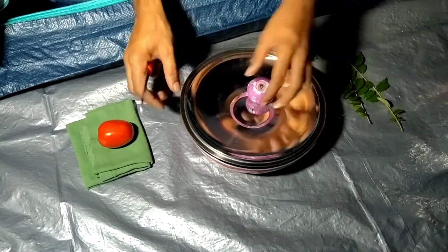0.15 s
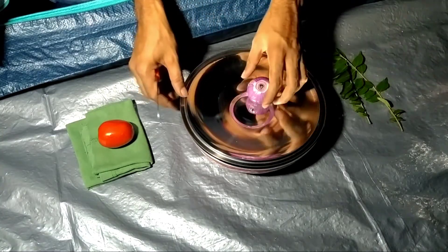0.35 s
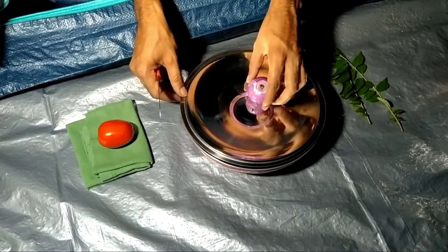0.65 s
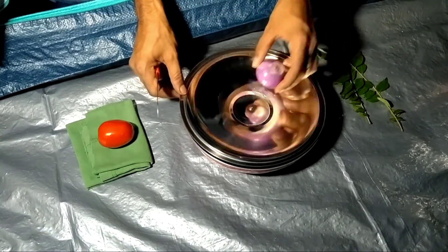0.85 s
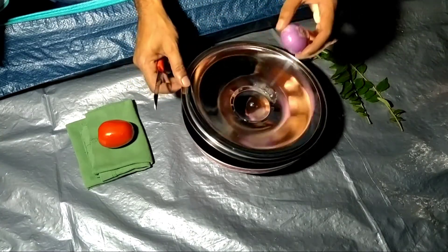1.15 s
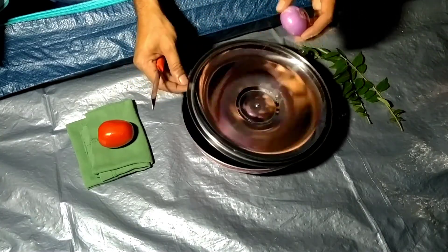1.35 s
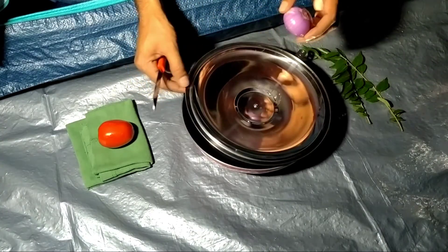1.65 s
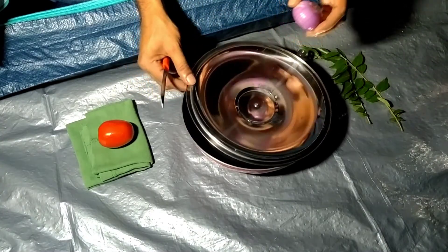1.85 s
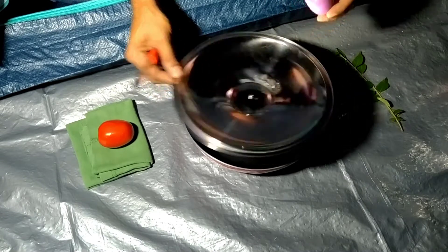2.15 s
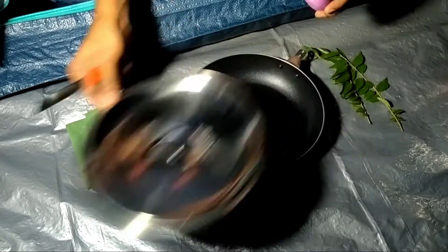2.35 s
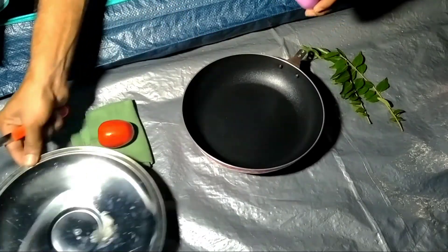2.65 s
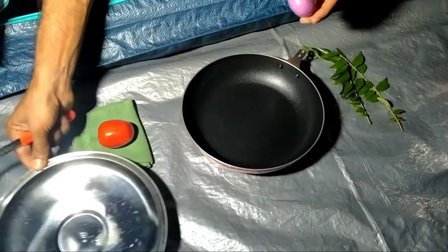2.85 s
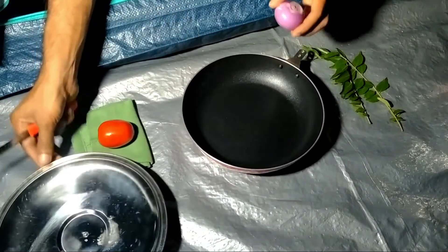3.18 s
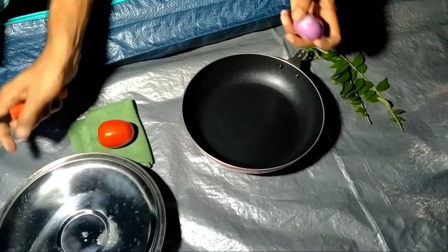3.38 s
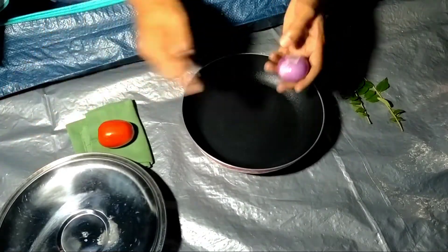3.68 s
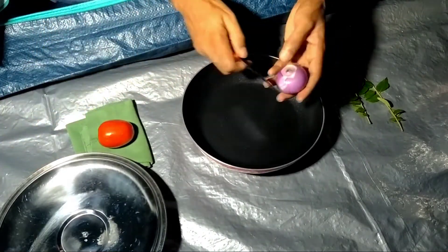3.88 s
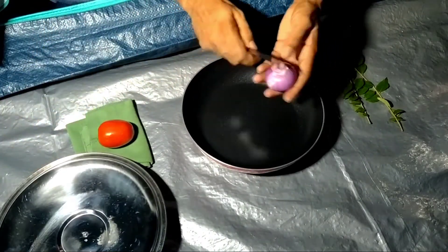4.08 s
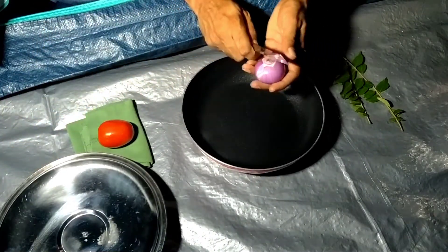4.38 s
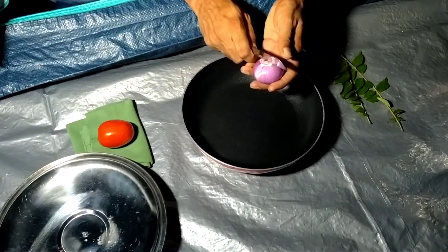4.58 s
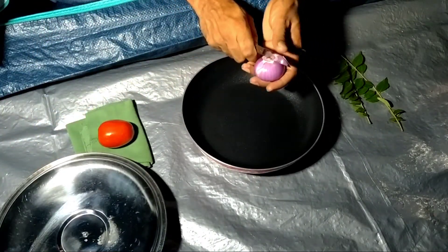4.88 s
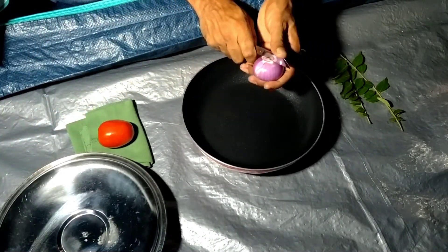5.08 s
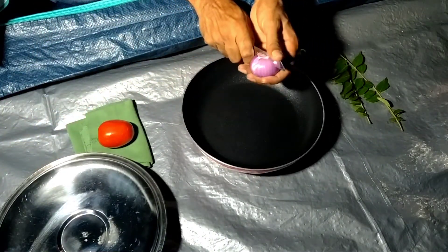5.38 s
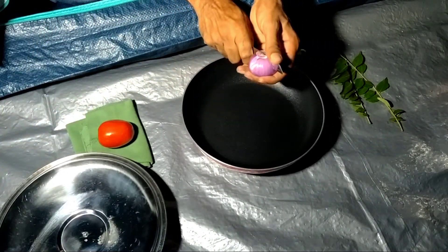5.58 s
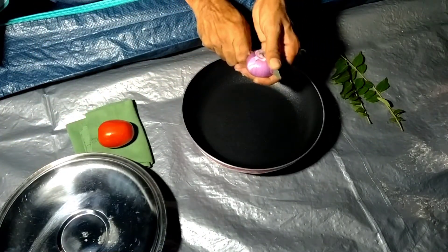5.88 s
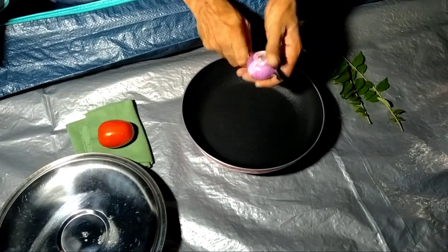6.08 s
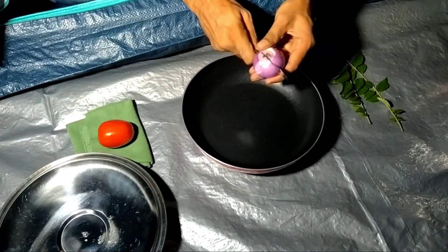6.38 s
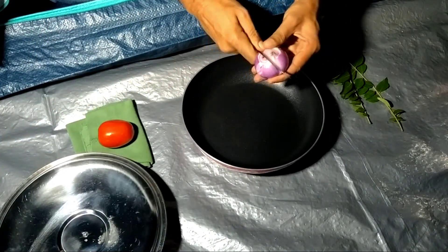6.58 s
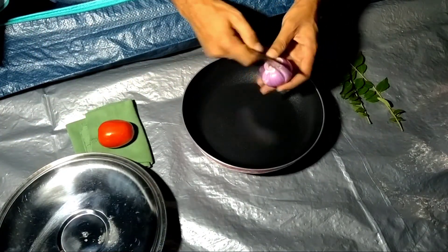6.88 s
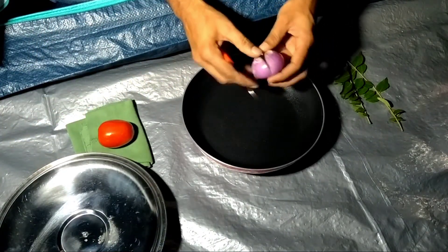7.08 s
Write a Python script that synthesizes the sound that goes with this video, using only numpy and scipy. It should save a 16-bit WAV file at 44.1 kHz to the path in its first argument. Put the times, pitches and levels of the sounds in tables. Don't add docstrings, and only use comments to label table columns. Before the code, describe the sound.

Outdoors at night, steady shrill crickets surround a tiny metal clink, one hard lid clang, then papery onion peel crackling close by.

```python
import sys
import numpy as np
from scipy import signal
from scipy.fft import rfft, irfft
from scipy.io import wavfile
from scipy.ndimage import uniform_filter1d

SR = 44100
rng = np.random.default_rng(int(sys.argv[2]) if len(sys.argv) > 2 else 0)


def dump_mix(stems):
    frames = np.atleast_2d(stems).T
    limited = np.clip(frames, -1, 1)
    pcm = np.round(limited * 32767).astype(np.int16)
    wavfile.write(sys.argv[1], SR, pcm)


def how_loud(loudness_db):
    steps = np.asarray(loudness_db, float) / 20
    return 10 ** steps


N = 319284

STROKES_PER_S = 24.5
CLANG_S = 1.389


def evened(x):
    return x / np.sqrt(np.mean(x ** 2) + 1e-20)


def read(points, hz):
    f, value = np.transpose(points)
    return np.interp(np.log(hz + 1), np.log(f + 1), value)


def add(mix, s, sound, pan_db=0):
    part = mix[:, round(s * SR):][:, :sound.shape[-1]]
    part += sound[..., :part.shape[1]] * how_loud(np.array([[pan_db / 2], [-pan_db / 2]]))


def colour(x, points, tilt_db=0):
    hz = np.fft.rfftfreq(x.shape[-1], 1 / SR)
    tilt = tilt_db * np.tanh(np.log2((hz + 1) / 5000))
    return irfft(rfft(x) * how_loud(read(points, hz) + tilt), x.shape[-1])


def band(x, hz, width_hz):
    b, a = signal.iirpeak(hz, hz / width_hz, SR)
    return signal.lfilter(b, a, signal.lfilter(b, a, x))


def ring(modes, length):
    hz, db, t60 = np.transpose(modes)[..., None]
    t = np.arange(round(length * SR)) / SR
    return (how_loud(db - 60 * t / t60) * np.sin(2 * np.pi * hz * t)).sum(0)


def bushes(x, t60, wet_db, echo=1):
    t = np.arange(SR // 3) / SR
    taps = rng.standard_normal((2, len(t))) * (rng.random((2, len(t))) < .05)
    taps = taps * how_loud(-60 * t / t60) * np.minimum(t / 0.0055, 1)
    taps *= how_loud(wet_db) / np.linalg.norm(taps, axis=1, keepdims=True)
    near = rng.integers(150, 1000, (2, 3))
    np.put_along_axis(taps, near, echo * rng.uniform(.4, .8, near.shape), 1)
    taps[[0, 1], rng.integers(0, 24, 2)] += 1
    taps /= np.linalg.norm(taps, axis=1, keepdims=True)
    return signal.fftconvolve(x[None], taps, axes=1)


def trill(length, top_hz, per_s, fall_hz, closed, sluggish, overtone_db, lean=.72):
    t = np.arange(round(length * SR)) / SR
    phase = np.minimum(t * per_s % 1 / closed, 1)
    cold = sluggish * np.exp(-1.4 * np.floor(t * per_s))
    hz = top_hz * (1 - 0.03 * cold) - fall_hz * phase ** 1.8
    turn = 2 * np.pi * np.cumsum(hz) / SR
    stroke = abs(np.sin(np.pi * phase ** lean))
    stroke *= (1 - 0.14 * cold) * (1 - 0.24 * sluggish * np.exp(-t / .15))
    stroke *= np.minimum((length - t) / 0.063, 1)
    return evened(stroke * (np.sin(turn) + how_loud(overtone_db) * np.sin(2 * turn)))


def air():
    # (frequency [Hz], level [dB per Hz])
    hiss = [(20, -84.5), (100, -84.5), (220, -83.5), (450, -89.5), (900, -94), (1800, -99), (2800, -99),
            (4500, -93.5), (6000, -108), (8500, -103), (12000, -104), (12400, -120), (16000, -126)]
    # (frequency [Hz], likeness [0-1])
    likeness = [(30, 0.12), (300, 0.033), (1000, 0.19), (3000, 0.12), (15000, 0.0181)]
    hz, _, z = signal.stft(rng.standard_normal((2, N)), SR, nperseg=1024)
    same = np.clip(read(likeness, hz), 0, 1)[:, None]
    z = np.array([z[0], same * z[0] + np.sqrt(1 - same ** 2) * z[1]])
    patches = uniform_filter1d(rng.standard_normal(z[0].shape), 10, 0)
    patches = evened(uniform_filter1d(patches, 8, 1))
    patch_db = 4.5 * np.clip(hz / 1500, .3, 1)[:, None] * patches
    z = z * how_loud(read(hiss, hz)[:, None] + patch_db) * np.sqrt(SR / 2)
    return signal.istft(z, SR, nperseg=1024)[1][:, :N]


def insect_bands():
    # (pitch [Hz], width [Hz], level [dB], throbs [per s], throb depth [0-1])
    far_bands = [(3070, 340, -65, 0.728, .4), (3825, 100, -64.5, 3.0, 0.5), (5130, 60, -71.5, 6.5, .8),
                 (5346, 1100, -57.5, 0.81, 0)]
    out, t = np.zeros((2, N)), np.arange(N) / SR
    for hz, width_hz, db, per_s, depth in far_bands:
        pace = per_s * (1 + .5 * np.interp(t, np.arange(30) / 4, rng.standard_normal(30)))
        throb = 1 + depth * np.sin(2 * np.pi * (np.cumsum(pace) / SR + rng.random()))
        out += how_loud(db) * throb * evened(band(rng.standard_normal((2, N)), hz, width_hz))
    return out


def thin_singer():
    # (start [s], level [dB])
    thin_turns = [(.755, -60), (1.795, -65), (2.79, -62), (4.17, -62), (5.405, -63), (6.92, -65)]
    out, per_s = np.zeros((2, N)), 6.75
    song = trill(4 / per_s, 5050, per_s, fall_hz=25, closed=.3, sluggish=0, overtone_db=-60, lean=1)
    for s, db in thin_turns:
        add(out, s, how_loud(db) * bushes(song, t60=.3, wet_db=-4.5, echo=.3))
    return out


def low_cricket():
    out, db, pan_db = np.zeros((2, N)), -59.5, -4.5
    song = trill(.27, 3320, 10.7, fall_hz=380, closed=.5, sluggish=0, overtone_db=-60, lean=1.1)
    turns = np.arange(.028, N / SR, 1.4915)
    for s in np.delete(turns, 1):
        add(out, s, how_loud(db) * song, pan_db)
        add(out, s, how_loud(db - 2) * bushes(song, t60=0.55, wet_db=-6, echo=0.53), pan_db)
    return out


def far_chorus():
    # (time [s], level [dB])
    swell = [(0, -37.5), (.6, -35.5), (1.2, -34.5), (1.452, -41), (1.95, -42.5), (2.2, -39.5), (2.7, -43.5),
             (2.879, -47), (3.3, -39.5), (3.75, -44.5), (4.25, -39), (4.65, -41.5), (5.099, -44),
             (5.35, -35), (6.0, -42), (6.45, -39), (6.851, -38), (7.24, -29)]
    crowd = np.zeros(N + 2 * SR)
    for k, (high, pace) in enumerate(rng.standard_normal((120, 2))):
        song = trill(.3, 7780 + 420 * np.tanh(high), STROKES_PER_S + pace, 850, .5, .5, -41)
        crowd[round(k * .066 * SR):][:len(song)] += song
    far = bushes(crowd[:N + SR // 2], t60=.45, wet_db=10)
    far = evened(far[:, SR // 2:][:, :N])
    out = np.zeros((2, N))
    add(out, 0, far * how_loud(np.interp(np.arange(N) / SR, *np.transpose(swell))), -2.5)
    return out


def near_crickets():
    # (start [s], level [dB], left minus right [dB])
    lead_trills = [(.13, -28, -3.5), (.769, -23, 2), (1.53, -34.5, -1), (2.225, -28, 1), (2.907, -31, -3),
                   (3.72, -40.5, -0.5), (4.3, -31, -5.5), (5.396, -24, 2.5), (5.65, -32, -1),
                   (6.883, -24, 2.5)]
    deep_trills = [(1.06, -38.5, 0.5), (2.5, -41, 2), (3.36, -38, -3), (3.9, -36.5, -1), (4.68, -35.5, 1),
                   (6.05, -47, -19.5)]
    high_trills = [(.45, -41.5, -1.5), (2.05, -54.5, 6.5), (3.15, -43.5, -3.5), (3.55, -50.5, -1),
                   (5.05, -56, -20), (5.7, -58.5, -3), (6.55, -43.5, 19)]
    out = np.zeros((2, N))
    # trills, trill length in s, pitch in Hz at the start of a wing stroke
    singers = [(lead_trills, 0.26, 7850), (deep_trills, 0.24, 7500), (high_trills, 0.13, 8030)]
    for trills, length, hz in singers:
        for start, db, pan_db in trills:
            song = trill(length, hz, STROKES_PER_S, fall_hz=1057.6, closed=0.66, sluggish=.9, overtone_db=-39.5)
            wet_db = 10.5 - .3 * (db + 28)
            add(out, start, how_loud(db) * bushes(song, t60=0.9, wet_db=wet_db), pan_db)
    return out


def bumps():
    # (time [s], level [dB], pitch [Hz], left minus right [dB])
    hollow_bumps = [(0.502, -50, 388, -2), (0.646, -46, 330, 0), (.801, -48, 450, 0), (0.842, -47, 460, 0),
                    (0.912, -35, 482, 1), (0.965, -45, 700, -1), (1.04, -52, 630, -2), (1.18, -49, 730, -2),
                    (1.23, -51, 750, 0), (1.93, -55, 600, 0), (1.975, -52, 620, 0), (2.998, -44, 543, -2.5)]
    dry_taps = [(0.331, -51, 318, 0), (0.801, -34, 2360, -6), (2.0, -45.5, 600, -1), (3.11, -53, 1330, -8),
                (2.094, -45, 600, -0.5), (2.612, -55, 860, 4), (3.022, -42.5, 430, -4),
                (3.048, -48, 880, -2), (4.23, -50, 500, -1), (6.608, -44.5, 300, 8)]
    out, t = np.zeros((2, N)), np.arange(6000) / SR
    for knocks, t60 in ((hollow_bumps, 0.19), (dry_taps, 0.065)):
        for s, db, hz, pan_db in knocks:
            puff = band(rng.standard_normal(len(t)), hz, 0.78 * hz)
            puff *= how_loud(-60 * t / t60) * np.minimum(t / 0.002, 1)
            add(out, s, how_loud(db + 0.5) * puff / abs(puff).max(), pan_db)
    return out


def rustle():
    # (start [s], length [s], level [dB], left minus right [dB], body over treble [dB])
    moves = [(0.746, 0.94, -61.5, -4, 4.5), (2.386, 0.27, -56.5, -3, -3), (3.003, 0.058, -64, -13, 18.5),
             (3.39, 0.58, -60, -9, -0.5), (3.754, 0.31, -52, -7.5, -6), (4.134, 0.19, -67.5, 1, 7.5),
             (4.9, 0.47, -52.5, -3, -18), (5.441, .17, -45, -1, -14.5), (5.638, .19, -44.5, -3, -19),
             (5.783, 0.25, -42.5, -4, -20.5), (5.956, .24, -55, -4, -12), (6.438, 0.22, -43.5, -5, -22),
             (6.581, .13, -40, 4, -11.5), (6.691, 0.13, -48, -4.5, -9), (6.919, 0.071, -54, 7, 0.5)]
    out = np.zeros((2, N))
    for s, length, db, pan_db, body_db in moves:
        n = 2 * round(length * SR / 2)
        grains = how_loud(2.35 * rng.exponential(1, n)) * (rng.random(n) < 900 / SR)
        grit = (1.8 + evened(uniform_filter1d(grains, 60))) * rng.standard_normal((2, n))
        treble = colour(grit, [(7000, -21.5), (8800, -4.0), (12000, -5.5), (12500, -20.5), (16000, -33)])
        body = colour(grit, [(600, -5), (1500, 7.5), (3000, 1.0), (6500, 2.0), (9000, 0), (16000, -39)])
        side = how_loud(np.array([[pan_db], [-pan_db]]) / 2)
        move = evened(treble) * side + how_loud(body_db) * evened(body)
        add(out, s, how_loud(db) * move * signal.windows.hann(n))
    return out


def skin_cracks():
    # (time [s], level [dB], treble tilt [dB], left minus right [dB])
    snaps = [(0.1998, -47, 17, 3), (0.3338, -43.5, -13.5, 3), (0.503, -39.5, -11, 3),
             (0.9124, -35, -6.5, -8), (2.998, -43.5, -17, -7), (5.13, -44, 2, 1), (5.2131, -40, -1, -2),
             (5.3035, -33, -5.5, -4.5), (5.3075, -25.5, -3, 1.5), (5.3115, -28, 1.5, 1.5),
             (5.3155, -39, 1, 1), (5.6249, -45, 6, 2.5), (5.9249, -37.5, -4, 2.5), (6.9522, -34.5, -1, -6),
             (5.024, -48, 8, -2), (5.1847, -48, 7.5, -2.5), (5.494, -47.5, 3, -4.5), (5.6771, -43, -4, -2),
             (5.811, -41.5, -4, 4), (5.986, -48, 0, -6)]
    # (time [s], level [dB], left minus right [dB], treble tilt [dB])
    tear = [(6.5093, -31.5, -1.5, 8), (6.521, -29.5, -1, 8.5), (6.5286, -25, -2.5, 8),
            (6.536, -26.5, 0, 5.5), (6.55, -39, -0.5, 1), (6.5706, -28.5, -0.5, 6), (6.581, -29.5, 4, 0),
            (6.591, -40, -3, -9), (6.6026, -29, -0.5, -3), (6.6165, -18.5, -1.5, 0),
            (6.6247, -17.5, -4, -3), (6.6373, -18.5, -2, 6), (6.645, -20.5, 4, -1), (6.653, -27.5, 0, 1.5),
            (6.6575, -23.5, 1, -6), (6.664, -23, -5, 1.5), (6.6784, -24.5, -5.5, -3),
            (6.7081, -24, -0.5, -1), (6.7153, -21.5, -6, -2), (6.721, -35, -5.5, 3.5),
            (6.7384, -28, -1.5, -7), (6.7463, -20.5, -4, -3), (6.7524, -18, -3, 0), (6.767, -28.5, -2, -6),
            (6.759, -31, -0.5, -5), (6.7961, -27.5, 1.5, -2), (6.8157, -33.5, -0.5, -6)]
    # (frequency [Hz], level [dB per Hz])
    skin = [(290, -31), (500, -32), (878, -36), (1500, -17.5), (2100, -14.5), (3460, -7.5), (4820, -8),
            (8580, 2.5), (10200, -2.5), (11100, 3.5), (15700, -38)]
    out, t = np.zeros((2, N)), np.arange(2048) / SR
    length = .0026
    cracks = [(*row, .06) for row in snaps]
    cracks += [(s, db, tilt_db, pan_db, 0.27) for s, db, pan_db, tilt_db in tear]
    for s, db, tilt_db, pan_db, rattle in cracks:
        noise = evened(colour(rng.standard_normal((2, len(t))), skin, tilt_db))
        noise = (noise + 0.5 * noise[0]) / 1.35
        late = t / length - 2
        burst = np.exp(-(late / 0.93) ** 2)
        burst += rattle * how_loud(-60 * t / 0.24) * np.clip(late + 1, 0, 1)
        add(out, s - 1.2 * length, how_loud(db - 1.0) * burst * noise, pan_db)
    return out


def lid_blows():
    # (time [s], level [dB], brightness [dB])
    blows = [(1.374, -19, -7), (1.382, -11, -3), (1.389, 0.5, 0.5), (1.393, -7, 1.5), (1.406, -18.5, -17),
             (1.426, -6, 3), (1.441, -17, 8.5), (1.476, -23, 8), (1.49, -13, -3), (1.509, -33, 11),
             (1.521, -16, -1.5), (1.592, -15.5, -5.5), (1.601, -18, 3), (1.616, -13, -1.5),
             (1.644, -29, -6.5)]
    # (pitch [Hz], level [dB], time to fall 60 dB [s])
    lid_modes = [(271, -22.5, 0.44), (410.7, -5.5, 0.039), (518.4, -6.5, 0.13), (560, -5, 0.13),
                 (672, 0, 0.16), (753, 13, 0.029), (808, -28, 1.9), (872, -12, 0.55), (921.6, -4, 0.3),
                 (1095, -17, 0.22), (1227, -28.5, 1.1), (1250, -38.5, 0.25), (1240, -15.5, .15),
                 (1751, -4.5, 0.15), (2089, -17, 0.36), (1188, -27, 0.76), (2120, -23, 0.7),
                 (2164, -20, 0.8), (2290, -31, 0.35), (2514, -36, 1.4), (2810, -40, 1.7),
                 (2980, -29.5, 0.34), (3000, -43.5, 2.1), (3150, -30, 0.9), (3700, -29.5, 0.27),
                 (4470, -19, 0.26), (3488, -26, 0.61), (3240, -25, .5), (4732, -26.5, .4), (5280, -30, .5),
                 (4040, -33.5, .4), (1780, -16.5, .12), (716, -13, 0.4), (3930, -26, 0.26), (5170, -34, .6),
                 (5574, -36, .4), (2370, -18.5, .2), (2810, -19, .12), (5700, -33, .1), (8830, -5.5, 0.1),
                 (9700, -26, 0.113), (11370, -17.5, 0.22)]
    # (frequency [Hz], level [dB per Hz])
    rim_clash = [(24, -77.5), (40, -52), (352, -28.5), (657, -15), (1010, -14.5), (2080, -13),
                 (2600, -18.5), (3000, -17), (4150, -25), (4550, -18.5), (5930, -21.5), (10300, -14),
                 (15700, -60.5)]
    out, t = np.zeros((2, N)), np.arange(8192) / SR
    hz, level_db, t60 = np.transpose(lid_modes)
    high = np.log2(hz / 1000)
    after = np.arange(round(.9 * SR), dtype=np.float32) / SR
    dying = how_loud(level_db[:, None] - 60 * after / t60[:, None])
    dying = dying * np.minimum(after / 0.003, 1)
    fade = (how_loud(-60 * t / 0.036) + 0.37 * how_loud(-60 * t / 0.35)) * np.minimum(t / 0.0013, 1)
    for s, db, bright_db in blows:
        pressed = hz + 2.5 / t60 * rng.standard_normal(len(hz))
        modes = dying * np.sin(np.float32(2 * np.pi * pressed)[:, None] * after)
        share = rng.choice([-1, 1], len(hz)) * how_loud(4.0 * rng.standard_normal(len(hz)) + bright_db * high / 2)
        apart = np.clip(0.18 * high, 0, 1) * rng.uniform(-1.13, 1, len(hz))
        sides = np.array([share * (1 + apart), share * (1 - apart)])
        add(out, s, how_loud(db - 15.0) * sides @ modes)
        middle, apart_noise = rng.standard_normal((2, len(t)))
        apart_noise = colour(apart_noise, [(700, -12.5), (2000, -5.5), (4500, 3.5), (16000, -4.5)])
        clash = colour(middle + apart_noise * [[1], [-1]], rim_clash, bright_db)
        add(out, s, how_loud(db - 12.0 + .4 * min(bright_db, 0)) * evened(clash) * fade)
    return out * how_loud(-45 * np.maximum(np.arange(N) / SR - 2.0, 0))


def lid_touches():
    # (pitch [Hz], level [dB], time to fall 60 dB [s])
    knob_ring = [(2150, -24, 0.6), (2334, -15, 0.51), (2374, -7, 0.2), (2550, -20, 0.42), (2640, -20, 0.63),
                 (2970, -27, 0.73)]
    pan_ring = [(1593, -42, 2.6)]
    flick_ring = [(920, -45, 0.27), (643, -42, 0.052)]
    out = np.zeros((2, N))
    add(out, .8007, how_loud(-31) * ring(knob_ring, 0.37))
    add(out, CLANG_S, ring(pan_ring, 1.5))
    add(out, CLANG_S, how_loud(-31) * np.sin(np.pi * np.arange(300) / 300) ** 2)
    add(out, 2.094, ring(flick_ring, .2))
    return out


def scene():
    since = np.arange(N) / SR - CLANG_S
    duck = how_loud(-5 * (since > 0) * np.exp(-abs(since) / 1.31))
    background = duck * (air() + insect_bands() + thin_singer() + low_cricket())
    crickets = far_chorus() + near_crickets()
    return background + crickets + bumps() + rustle() + skin_cracks() + lid_blows() + lid_touches()


def masked(x):
    # (frequency [Hz], level [dB per bin])
    hearing_floor = [(3100, -100), (3400, -83), (3550, -66), (3800, -115), (5700, -87.5), (6200, -68),
                     (6700, -111.5), (8200, -95), (8350, -92), (9500, -81.5), (10700, -85.5), (12000, -106),
                     (12500, -65.5), (13800, -82.5), (14300, -94), (15800, -81)]
    hz, _, z = signal.stft(x, SR, nperseg=1024)
    power = uniform_filter1d((abs(z) ** 2).mean(0), 8, 0)
    power_db = 10 * np.log10(abs(uniform_filter1d(power, 4, 1)) + 1e-20)
    loud_db = power_db[(hz > 7000) & (hz < 8000)].max(0)
    over_db = power_db - 0.6 * (loud_db + 35) - read(hearing_floor, hz)[:, None]
    return signal.istft(z * np.clip(over_db / 2, 0, 1), SR, nperseg=1024)[1][:, :N]


def roll_off(x):
    return signal.sosfilt(signal.butter(12, 15870, fs=SR, output="sos"), x)


def record(dry):
    # (frequency [Hz], left minus right [dB])
    ports = [(2500, 0.2), (4400, -1), (8000, -4.5), (10500, -1), (12500, 26), (16000, 20.5)]
    hz = np.fft.rfftfreq(N, 1 / SR)
    uneven = how_loud(read(ports, hz) / 2 * [[1], [-1]])
    heard = irfft(rfft(dry) * uneven * (hz < 15830), N)
    return roll_off(masked(np.clip(heard, -.9, .9)))


dry = scene()
out = record(dry)
dump_mix(out)
```